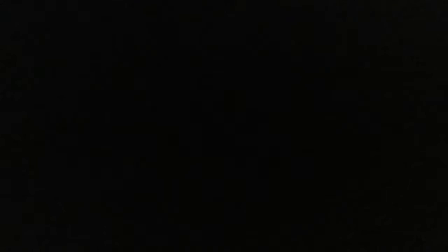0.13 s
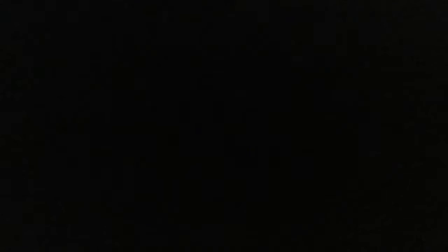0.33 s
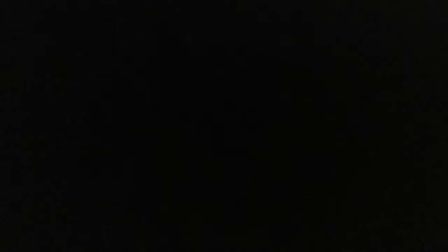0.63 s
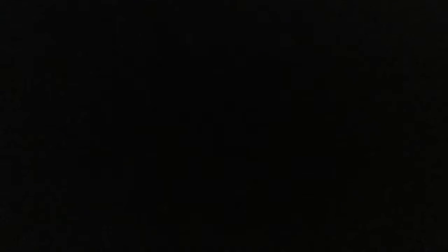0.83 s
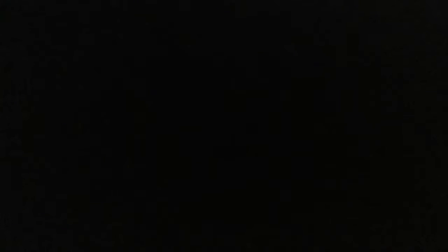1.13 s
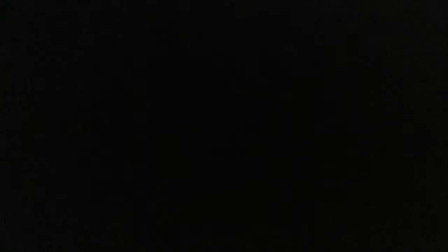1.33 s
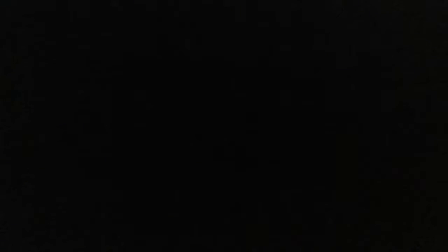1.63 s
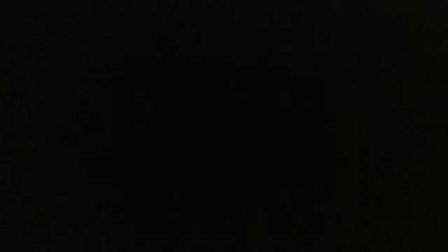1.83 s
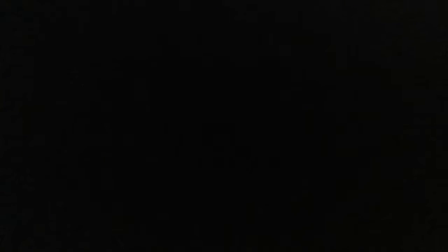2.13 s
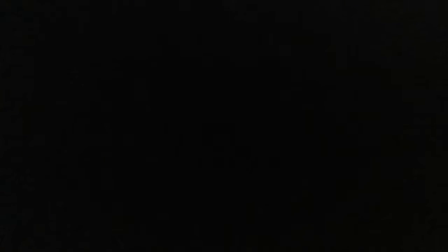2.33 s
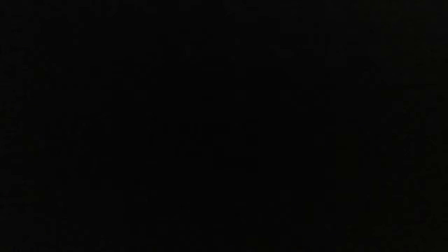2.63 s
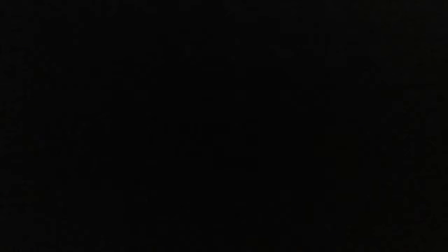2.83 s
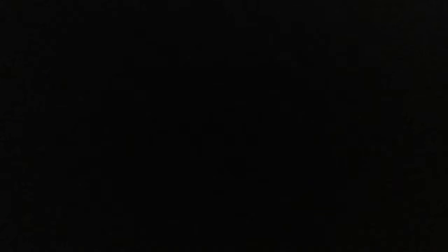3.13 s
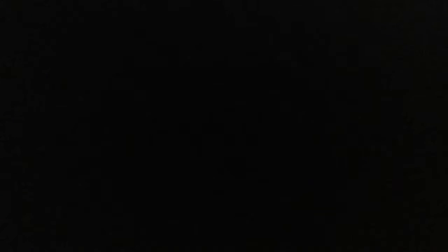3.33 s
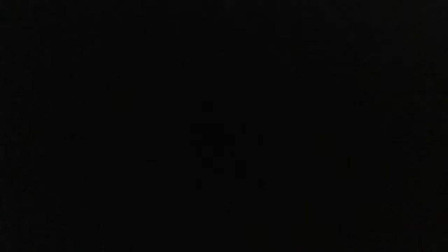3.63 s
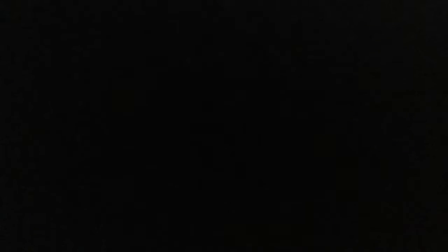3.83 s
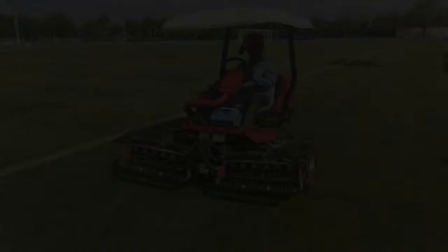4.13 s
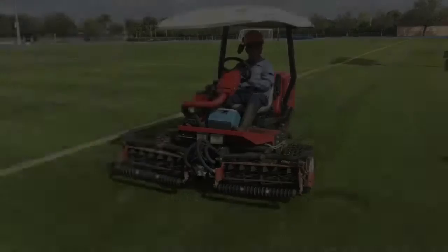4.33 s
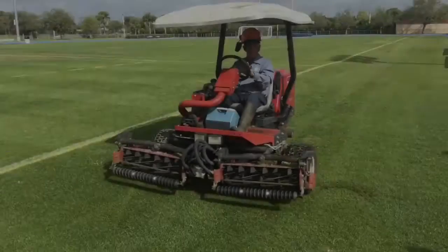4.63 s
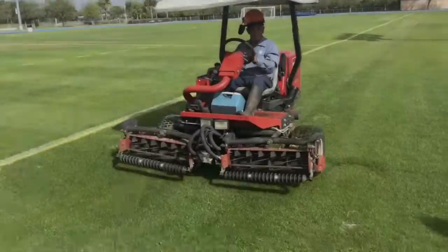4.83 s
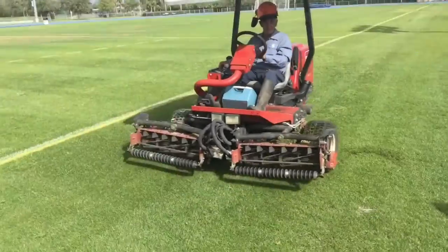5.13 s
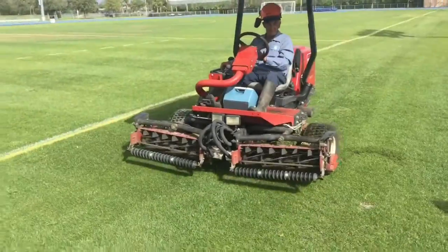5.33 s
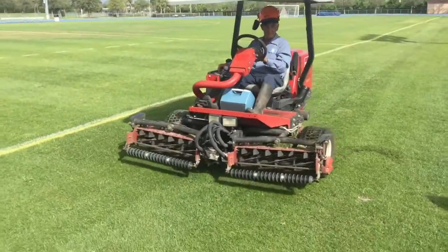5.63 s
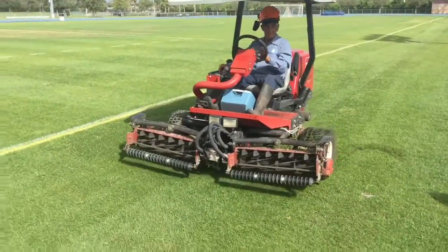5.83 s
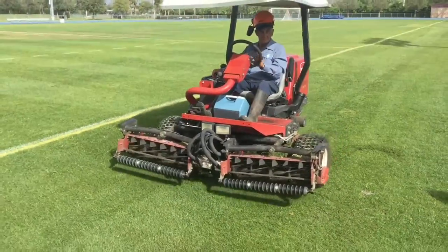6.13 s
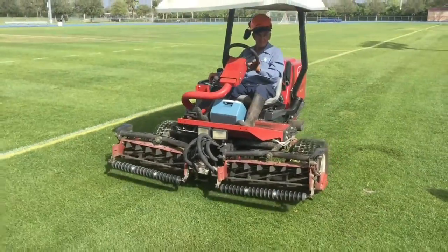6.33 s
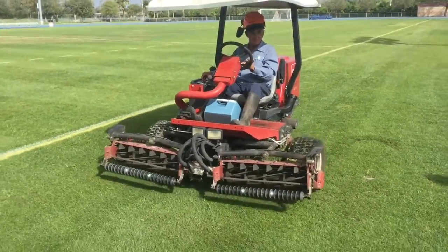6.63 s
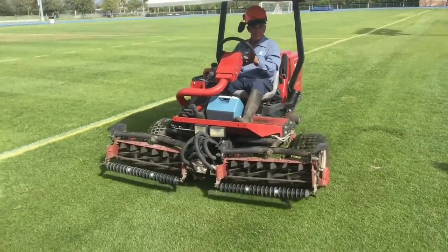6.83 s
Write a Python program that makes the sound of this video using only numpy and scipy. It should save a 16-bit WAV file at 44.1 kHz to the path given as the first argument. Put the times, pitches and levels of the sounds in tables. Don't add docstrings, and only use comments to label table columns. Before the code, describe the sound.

A three-cylinder diesel reel mower runs at constant speed on an open sports field, a few metres from the microphone. The sound fades in over a second; a dry linkage squeaks and a loose part clanks, then soft low thuds of rolling over turf join the booming drone, whine and clatter. A second small clank comes late, and it stops abruptly.

```python
import sys
import numpy as np
from scipy import signal
from scipy.fft import rfft, irfft
from scipy.io import wavfile
from scipy.ndimage import uniform_filter1d

SR = 44100
rng = np.random.default_rng(int(sys.argv[2]) if len(sys.argv) > 2 else 0)


def rack_gain(trim_db):
    fader = np.asarray(trim_db, float)
    return 10 ** (fader / 20)


def unload_wav(signal):
    wavfile.write(
        sys.argv[1],
        SR,
        np.round(np.clip(np.atleast_2d(signal).T, -1, 1) * 32767).astype(np.int16),
    )


N = 307818
TIME = np.arange(N) / SR

# (time [s], firing rate [Hz], load [0-1], exhaust turned towards the microphone [0-1])
ENGINE = [(0.2, 64.9, 0, 0), (0.5, 64.45, 0.14, 0.14), (0.8, 64.3, 0.3, 0), (1.1, 64.17, 0.46, 0),
          (1.4, 63.86, 0.79, 0), (1.7, 63.95, 0.9, 0.13), (2.3, 63.77, 0.57, 0.27), (2.9, 63.66, 1, .3),
          (3.3, 63.82, 0.92, 0.23), (3.8, 64.3, 0.5, .45), (4.3, 63.98, 0.38, 0.3),
          (4.7, 64.35, 0.11, 0.64), (5.0, 64.35, 0.34, 0.67), (5.6, 64.25, 0.23, 0.9),
          (6.2, 64.28, 0.2, 0.8), (6.5, 64.5, 0, 1), (6.97, 64.2, 0, 1)]
# (order), (level [dB])
CYCLE_ORDERS = [4, 5, 7, 8, 10, 11, 12, 15, 19, 24, 27, 35, 36]
CYCLE_DB = [-68, -49, -45, -40, -49, -57, -42.5, -42, -52, -51, -44.5, -48.5, -51]
# (unloaded and facing away [dB], gain at full load [dB], gain when turned [dB])
FIRING_LEVEL = (-27, -13.5, .6)
BOOM_LEVEL = (-22, 2.36, -0.77)
THIRD_LEVEL = (-37.5, 0.92, 7.4)
RUMBLE_LEVEL = (-36, 1.96, 3.3)
AIR_LEVEL = (-29.5, 1.04, -0.33)
CLATTER_LEVEL = (-37.5, 1.8, -1.576)
HISS_LEVEL = (-47.5, 2.1, -1.5)
BELT_LEVEL = (-61.5, -3, -24)
FAN_DB = [-26, -2, -10, -7, -1, -3, -7, -15, -21]
DRIVEN_DB = [-32, -45, -50.5, -42.5]
# (centre time [s], half length [s], gain [dB])
FAN_SWELLS = [
    (3.45, .45, -9.5),
    (4.25, 0.4, -2),
    (6.5, 0.28, -4),
]
PUMP_SWELLS = [(.35, 0.37, 11.6), (1.45, 0.22, 7.6), (1.9, 0.64, 11.2), (2.9, .3, 5.2), (3.9, 0.54, 2.5),
               (6.2, .5, 4)]
OCTAVE_SWELLS = [(.4, .7, 9), (1.1, 0.17, 6), (2.2, 0.71, 17.6), (3.15, 0.28, 8), (3.75, .25, 9.4),
                 (4.25, 0.52, 15.3), (5.6, 0.53, 13.05)]
GEAR_SWELLS = [(.15, 0.37, 14.7), (1.2, 0.38, 8.5), (2.2, 0.58, 14.2), (2.9, .2, 5), (4.4, 0.5, 8.1),
               (5.8, .5, 7.4)]
# (frequency [Hz], level per Hz [dB])
RUMBLE = [(20, -30), (32, -12.5), (50, -12), (66, 0.5), (82, -2.5), (110, -1), (170, -3.5), (220, -1.5),
          (290, -7), (380, -12.5), (450, -17.5)]
AIR = [(300, -17), (420, -7), (560, 0), (700, 0.5), (850, -4.5), (1050, -5.5), (1350, -7), (1650, -12),
       (2000, -16)]
CLATTER = [(1300, -13), (1900, 0), (2300, -1.5), (2600, -6), (2900, -12.5), (3400, -13.5), (4300, -15),
           (5500, -19), (7000, -21.5), (7600, -37), (9000, -45)]
HISS = [(4500, -8), (6500, -9.5), (7100, -6), (7600, -3.5), (8200, 0), (9200, 2), (10500, -1.5),
        (12500, -4), (14000, -9), (15000, -16), (15800, -21)]
# (frequency [Hz], width [Hz], level [dB])
PANELS = [(2133, 29, -51.5), (3620, 76, -63.5), (3180, 70, -65.5), (5800, 90, -72), (4310, 90, -65.5),
          (1292, 39, -50), (2050, 200, -63), (5430, 60, -68)]
# (time [s], half length [s], gain [dB])
PANEL_BUZZ = [(0.957, 0.091, 12), (1.3, 0.75, 6.5), (1.22, .05, -7), (1.45, 0.074, 9), (1.65, .06, 10),
              (1.88, .03, 4), (2.9, .5, 2), (4.0, 0.33, 4), (5.2, .4, 4.5), (5.85, .3, -6), (6.3, .15, 0)]
# (time [s], length [s], start frequency [Hz], end frequency [Hz], level [dB])
SQUEAK = [(.853, .042, 5450, 5380, -30), (.846, .03, 4000, 3920, -41), (.866, .05, 3900, 3830, -35),
          (.846, .028, 4880, 4830, -41), (.851, .02, 11400, 11220, -39), (.858, .03, 10580, 10640, -41),
          (.892, .045, 5510, 5500, -41), (.938, .022, 5680, 5690, -43), (.8, .055, 4200, 4000, -50),
          (.97, .11, 1010, 975, -38), (5.93, .03, 5800, 5800, -52), (6.49, .03, 5800, 5800, -52)]
# (time [s], rattle length [s], level [dB], low knock [dB], crackle [dB])
CLANKS = [
    (.907, .04, -42, -9, 2),
    (6.072, .036, -44, 1.5, 1),
    (1.02, .04, -48, -3, -4),
    (6.5, .015, -54, -6, -1),
    (5.95, .015, -54, -6, -1),
]
# (frequency [Hz], level [dB], 60 dB decay time [s])
CLANK_MODES = [(1398, 0, 0.051), (2240, -3, 0.016), (3080, -8, .015), (4180, -13.5, 0.017),
               (4540, -10, .02), (6430, -8.5, .012), (8450, -15, .015)]
# (time [s], peak level [dB])
JOLTS = [(0.989, -23), (1.226, -25), (1.419, -25), (1.562, -25), (1.769, -27), (2.092, -22), (2.256, -25),
         (2.409, -26), (2.6, -24), (2.768, -19), (3.009, -17), (3.357, -21), (3.649, -19), (3.775, -19),
         (3.975, -20), (4.231, -19), (5.269, -19)]
# (frequency [Hz], limit [dB])
DROP_BELOW = [(2500, -11), (3500, -6.5), (4300, -6), (6500, -5.5), (7600, -3.5), (8400, -8), (12000, -7),
              (13300, -3.5), (14200, -.5), (14700, 2.5), (15100, 3), (15400, 2.2), (15700, 2.5)]
# (time [s], raise [dB])
SHORTAGE = [(0, 3.5), (1.62, 3), (1.7, -3), (2.5, -1.5), (3.3, -1), (3.45, 1), (7, 0)]


def in_time(rows):
    s, *columns = np.transpose(rows)
    return [np.interp(TIME, s, column) for column in columns]


def answer(level, load, turned):
    steady_db, load_db, turned_db = level
    return steady_db + load_db * load + turned_db * turned


def swell(steady_db, rows):
    return steady_db + sum(db * np.exp(-((TIME - s) / length) ** 2) for s, length, db in rows)


def rms_one(x):
    return x / np.sqrt(np.mean(x ** 2) + 1e-20)


def drift(rate):
    r = np.exp(-80 * np.pi * rate / SR)
    steps = rng.standard_normal(N // 40 + 2002)
    slow = signal.lfilter([1], [1, -2 * r, r * r], steps)[2000:]
    return np.interp(np.arange(N) / 40, np.arange(len(slow)), rms_one(slow - slow.mean()))


def resonance(x, hz, width_hz):
    r = np.exp(-np.pi * width_hz / SR)
    poles = [1, -2 * r * np.cos(2 * np.pi * hz / SR), r * r]
    return signal.lfilter((1 - r * r) / 2 * np.array([1, 0, -1]), poles, x)


def tone(turns, order, level_db, waver_db, slip, locked=False):
    start = rng.random() * (not locked)
    phase = 2 * np.pi * (order * turns + start) + slip * drift(3.3)
    return np.sqrt(2) * rack_gain(level_db + waver_db * drift(3.06)) * np.sin(phase)


def coloured(source, spectrum, shared_db, patchy_db):
    hz, level_db = np.transpose(spectrum)
    edges = hz[0] * 2 ** np.arange(0, np.log2(hz[-1] / hz[0]) + 0.25, 0.25)
    log_hz = np.log(np.arange(N // 2 + 1) * SR / N + 1)
    full = rfft(source) * rack_gain(np.interp(log_hz, np.log(hz), level_db, left=-90, right=-90))
    out = 0
    for k in range(len(edges)):
        share = np.interp(log_hz, np.log(edges), np.arange(len(edges)) == k)
        flicker_db = patchy_db * (drift(28.6) + 0.48 * drift(1.3))
        out = out + irfft(full * share, N) * rack_gain(flicker_db)
    return rms_one(out * rack_gain(shared_db))


def exhaust(firings, load, firing_db, boom_db, third_db):
    since = TIME - 1.58
    rocking = np.cos(2 * np.pi * since * (5.45 + 0.72 * since / 2))
    throb_db = 2.5 * load ** 2 * rocking
    out = tone(firings, 1, firing_db + 2.5 * throb_db, waver_db=1.5, slip=0.12, locked=True)
    out += tone(firings, 2, boom_db + throb_db, waver_db=0.44, slip=0.04, locked=True)
    out += tone(firings, 3, third_db, waver_db=2.0, slip=0.62, locked=True)
    for order, db in zip(CYCLE_ORDERS, CYCLE_DB):
        out += tone(firings, order / 3, db, waver_db=1.65, slip=0.48, locked=True)
    return out


def driven(firings, fan_db, pump_db, octave_db, gear_db):
    fan_turns, pump_ratio, gear_ratio = firings * 0.794, 7.032, 10.156
    out = np.zeros(N)
    for order, db in enumerate(FAN_DB, start=1):
        out += tone(fan_turns, order, fan_db + db - 3.5, waver_db=1.5, slip=0.18)
    out += tone(firings, pump_ratio, pump_db - 0.5 + 0.7 * drift(12.0), waver_db=0.8, slip=0.46)
    out += tone(firings, 2 * pump_ratio, octave_db - 2.0, waver_db=1.4, slip=0.6)
    out += tone(firings, gear_ratio, gear_db - 2 + 1.8 * drift(30.0), waver_db=2.0, slip=0.7)
    return out


def panels(contacts):
    buzz_db, out = swell(0, PANEL_BUZZ), np.zeros(N)
    for k, (hz, width_hz, db) in enumerate(PANELS):
        ring = rms_one(resonance(resonance(contacts, hz, width_hz), hz, width_hz))
        out += ring * rack_gain(db + 1.2 * drift(3.0) + 3.2 * drift(15.0) + buzz_db * (k == 0))
    return out


def roar(firings, rumble_db, air_db, clatter_db, hiss_db):
    surge_db = 0.25 * drift(4.3) + 0.19 * drift(9.8)
    pulse = rack_gain(0.26 * np.cos(2 * np.pi * firings) + 0.15 * np.cos(2 * np.pi * firings / 3))
    blow_db = 1.6 * np.minimum(rng.exponential(1, N), 5)
    contacts = rng.standard_normal(N) * rack_gain(blow_db) * pulse
    ticks = rack_gain(0.59 * drift(155.0))
    rumble_surge_db = 0.45 * surge_db + 1.16 * drift(6.7)
    rumble = coloured(rng.standard_normal(N), RUMBLE, rumble_surge_db, patchy_db=1.8)
    air = coloured(rng.standard_normal(N) * ticks * pulse, AIR, surge_db, patchy_db=1.14)
    clatter = coloured(contacts * ticks, CLATTER, 0.5 * surge_db, patchy_db=2.5)
    hiss = coloured(contacts * ticks, HISS, 0.19 * surge_db, patchy_db=1.3)
    out = rack_gain(rumble_db + 4.5) * rumble + rack_gain(air_db - 1.22) * air
    out += rack_gain(clatter_db - 0.07) * clatter + rack_gain(hiss_db - 1.9) * hiss
    return out + panels(contacts)


def belt(level_db):
    white = rng.standard_normal(N)
    whistle = rms_one(resonance(resonance(white, 15370, 330), 15370, 330))
    return rack_gain(level_db + 1.5 * drift(8.0)) * whistle


def squeak():
    out = np.zeros(N)
    for s, length, start_hz, end_hz, db in SQUEAK:
        part = np.clip((TIME - s) / length, 0, 1)
        hz = start_hz + (end_hz - start_hz) * part
        phase = 2 * np.pi * np.cumsum(hz) / SR + 0.77 * drift(130.0)
        envelope = np.sin(np.pi * part ** 0.6) ** 1.2
        out += rack_gain(db + 2.5 + 2.2 * drift(120.0)) * envelope * np.sin(phase)
    return out


def clanks():
    clicks = rng.standard_normal(N) * (rng.random(N) < 0.06)
    out = np.zeros(N)
    for s, length, level_db, knock_db, crackle_db in CLANKS:
        envelope = np.sin(np.pi * np.clip((TIME - s) / length, 0, 1))
        burst = rack_gain(level_db) * envelope * clicks + 1e-18
        out += rack_gain(crackle_db + 9) * resonance(burst, hz=5500, width_hz=5000)
        for k, (hz, db, t60) in enumerate(CLANK_MODES):
            r, w = rack_gain(-60 / (t60 * SR)), 2 * np.pi * hz / SR
            ring = signal.lfilter([0, np.sin(w)], [1, -2 * r * np.cos(w), r * r], burst)
            out += rack_gain(db + 6.5 + knock_db * (k == 0)) * ring
    return out


def jolts():
    out = np.zeros(N)
    for (s, db), (pitch, phase) in zip(JOLTS, rng.random((len(JOLTS), 2))):
        age = np.maximum(TIME - s, 0) / 0.025
        envelope = age ** 2 * np.exp(2 - 2 * age)
        hz = 62.3 * (0.85 + 0.35 * pitch)
        out += rack_gain(db - 4.5) * envelope * np.sin(2 * np.pi * (hz * TIME + phase))
    return out


def scene():
    firing_hz, load, turned = in_time(ENGINE)
    firings = np.cumsum(firing_hz) / SR
    exhaust_levels = FIRING_LEVEL, BOOM_LEVEL, THIRD_LEVEL
    roar_levels = RUMBLE_LEVEL, AIR_LEVEL, CLATTER_LEVEL, HISS_LEVEL
    swells = FAN_SWELLS, PUMP_SWELLS, OCTAVE_SWELLS, GEAR_SWELLS
    mower = exhaust(firings, load, *[answer(level, load, turned) for level in exhaust_levels])
    mower += driven(firings, *[swell(db, rows) for db, rows in zip(DRIVEN_DB, swells)])
    mower += roar(firings, *[answer(level, load, turned) for level in roar_levels])
    mower += belt(answer(BELT_LEVEL, load, turned))
    return (mower + squeak() + clanks() + jolts())[None]


def drop_patches(x):
    padded = np.pad(x, [(0, 0), (0, 4096)], "reflect")
    hz, s, spec = signal.stft(padded, SR, nperseg=2048, noverlap=1536)
    power = uniform_filter1d(abs(spec) ** 2, size=5, axis=-2)
    power = uniform_filter1d(power, size=3, axis=-1)
    treble = np.clip((hz - 12300) / 1000, 0, 1)
    raise_db = np.interp(s, *np.transpose(SHORTAGE)) + 1.2 * np.interp(s, TIME, drift(16))
    limit_db = np.interp(hz, *np.transpose(DROP_BELOW), left=-60)[:, None] + np.outer(treble, raise_db)
    kept = power > np.median(power, axis=-1, keepdims=True) * rack_gain(2 * limit_db)
    return signal.istft(spec * kept, SR, nperseg=2048, noverlap=1536)[1][:, :N]


def band_limit(x):
    return signal.sosfilt(signal.butter(12, 15750, fs=SR, output="sos"), x)


def record(dry):
    fade_in = np.clip((TIME - 0.094) / 0.94, 0, 1) ** 1.036
    fade_out = np.clip((TIME[-1] - TIME) / 0.012, 0, 1)
    mix = drop_patches(dry) * fade_in * fade_out
    return band_limit(mix)


dry = scene()
out = record(dry)
unload_wav(out)
```